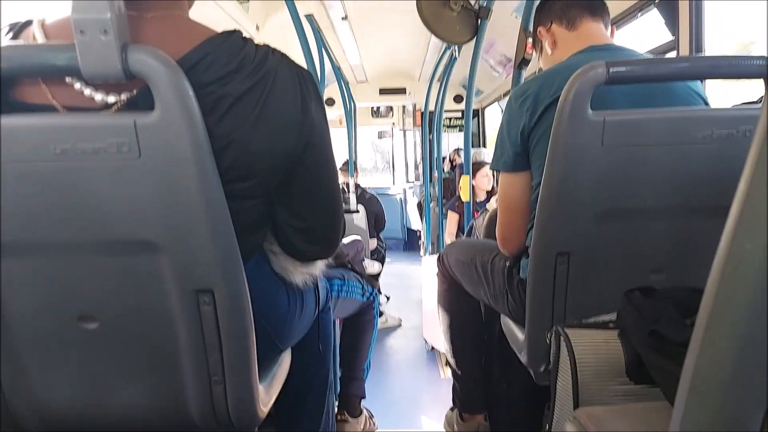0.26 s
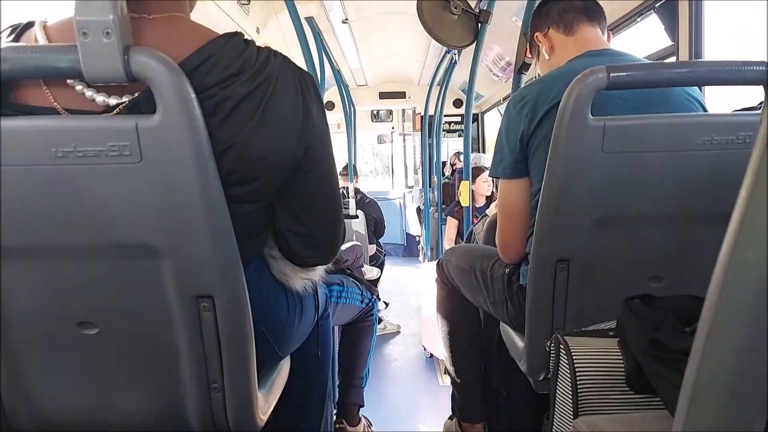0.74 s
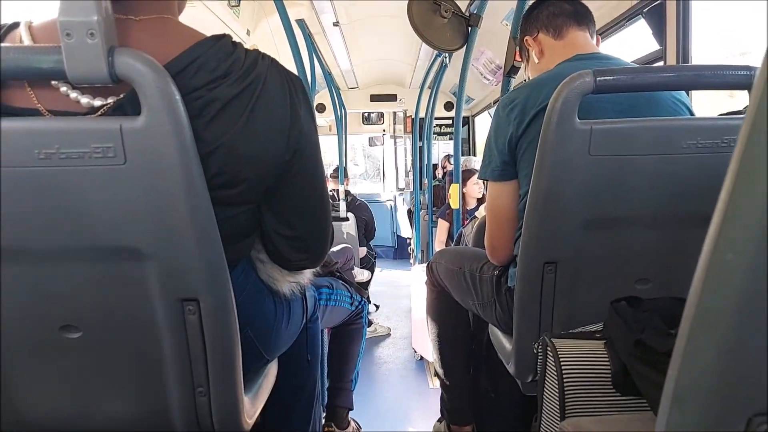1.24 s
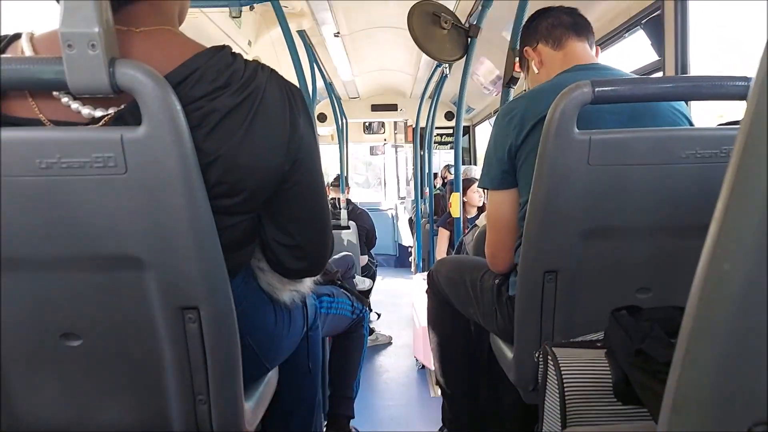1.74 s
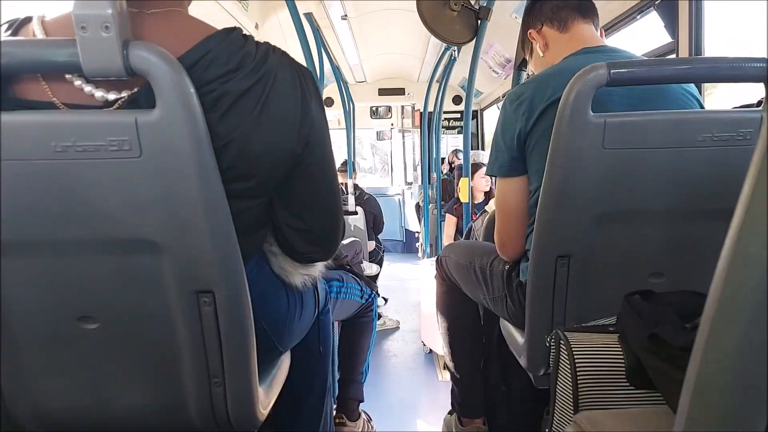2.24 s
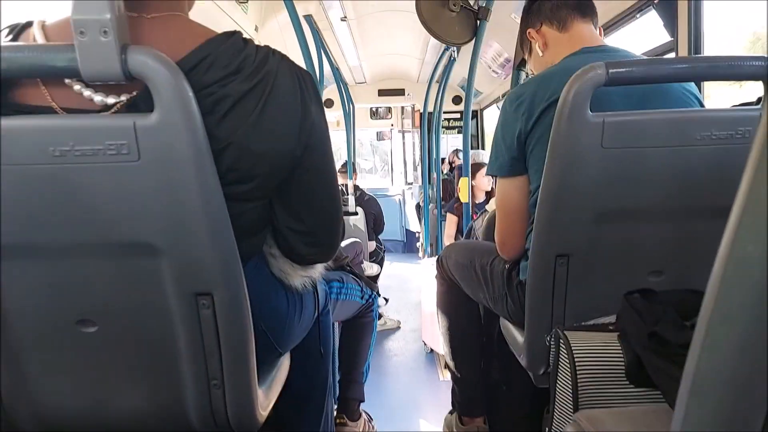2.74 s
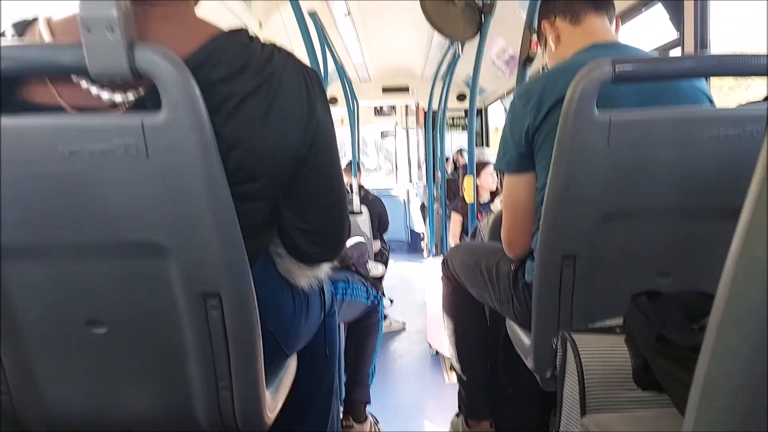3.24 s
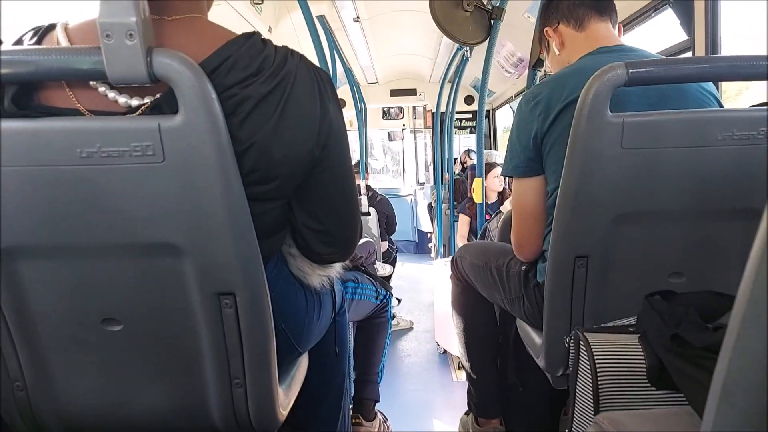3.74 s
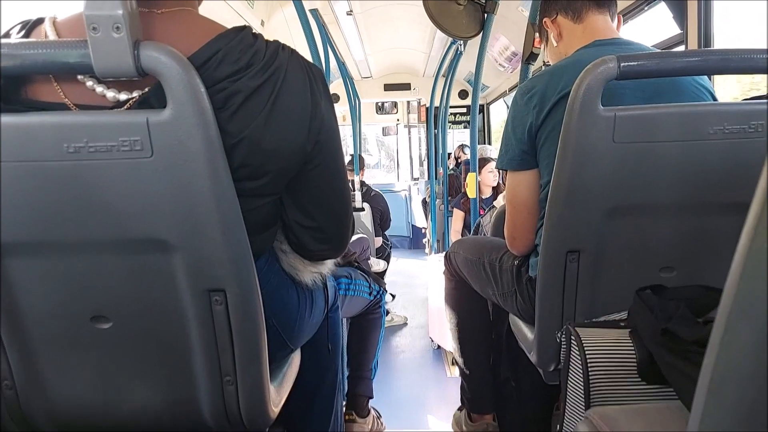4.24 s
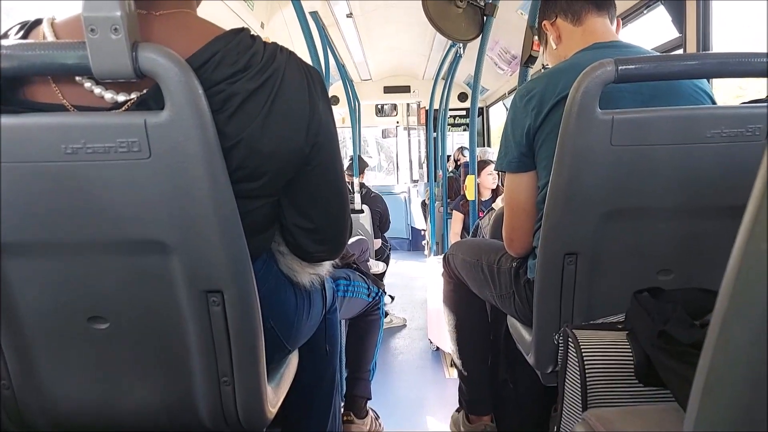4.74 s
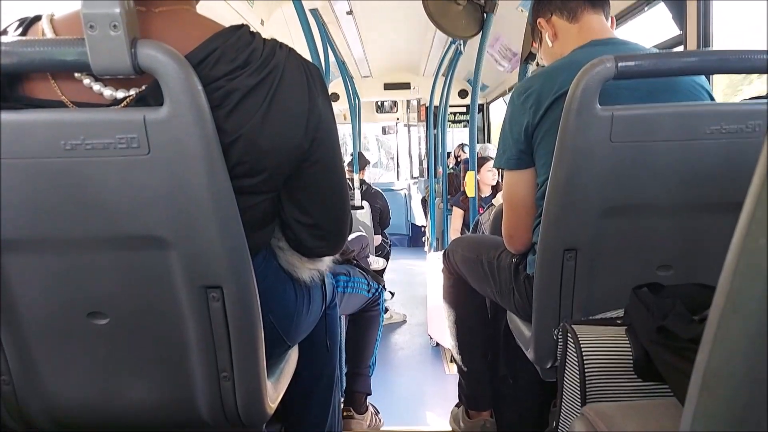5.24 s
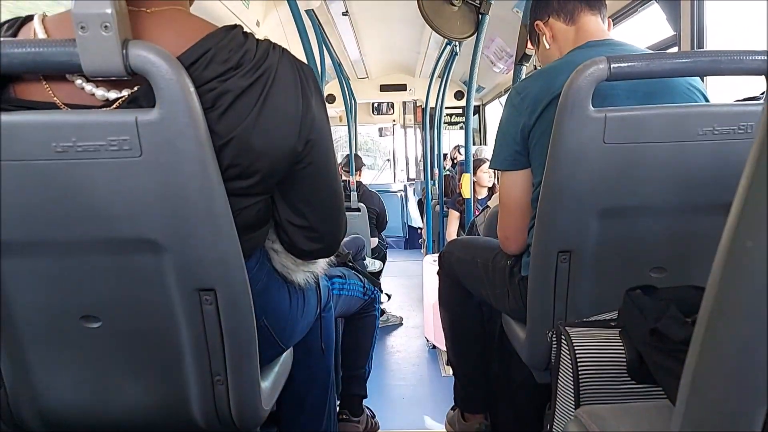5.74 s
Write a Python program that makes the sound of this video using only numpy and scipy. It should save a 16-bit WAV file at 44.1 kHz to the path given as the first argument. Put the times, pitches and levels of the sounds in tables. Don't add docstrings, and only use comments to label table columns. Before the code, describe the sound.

Continuous bus interior: heavy bass drone and floor rumble, muffled window roar, quiet fan and gear hum. Loose fittings click lightly early on, one panel thud stands out before two seconds, and a short burst of escaping air comes with a passing swell of traffic near 2.8. Double knocks and busy rattling follow, then it settles back to steady driving. Handheld stereo phone, bass-heavy, with slightly thin treble.

```python
import sys
import numpy as np
from scipy import signal
from scipy.fft import rfft, irfft, next_fast_len
from scipy.io import wavfile
from scipy.ndimage import uniform_filter1d, map_coordinates

SR = 44100
rng = np.random.default_rng(int(sys.argv[2]) if len(sys.argv) > 2 else 0)


def to_wav(s):
    ch = np.atleast_2d(s).T
    pcm = np.round(np.clip(ch, -1, 1) * 32767)
    wavfile.write(sys.argv[1], SR, pcm.astype(np.int16))


def volts_from_db(level):
    exponent = np.asarray(level, float) / 20
    return 10 ** exponent


N = 264159

# (frequency [Hz], level [dB per Hz])
HISS = [(900, -14), (1700, -6.5), (2500, 2.5), (3300, -5), (4200, -2.5), (5500, -8), (7000, -19.5),
        (10400, -14.5), (13400, -17.5), (15600, -17)]


def unit(x):
    return x / np.sqrt(np.mean(x ** 2) + 1e-20)


def along(points, hz):
    f, v = np.transpose(points)
    return np.interp(np.log(hz + 1), np.log(f + 1), v, left=v[0], right=v[-1])


def curves(rows):
    s, *cols = np.transpose(rows)
    return [np.interp(np.arange(N) / SR, s, c) for c in cols]


def wobble(rate):
    knots = rng.standard_normal(int(N * rate / SR) + 4)
    return map_coordinates(knots, [np.arange(N) * rate / SR])


def humps(times, heights, half_s):
    grid = np.arange(0, N + 128, 128) / SR
    bells = np.exp(-((grid[:, None] - times) / half_s) ** 2)
    return np.interp(np.arange(N) / SR, grid, bells @ heights)


def filtered(x, response):
    m = next_fast_len(N + 8192)
    return irfft(rfft(x, m) * response(np.fft.rfftfreq(m, 1 / SR)), m)[..., :N]


def resonance(f, hz, width):
    return 1 / (1 + ((f - hz) / width * 2) ** 2)


def rush(spectrum, patchy_db):
    # (frequency [Hz], left-right likeness [-1 to 1])
    alike = [(30, .99), (130, .98), (340, .92), (450, .6), (700, .4), (1300, -.1), (3100, 0), (4500, -.08),
             (8000, .08), (15000, -.05)]
    # (frequency [Hz], left-right [dB])
    port_lean = [(60, 1), (110, 0.5), (200, 2.5), (380, 1.5), (700, 1.5), (1290, 1), (2380, 4.5),
                 (4400, -3), (8120, 7.5), (15000, -5.5)]
    z = signal.stft(rng.standard_normal((2, N)), nperseg=512)[2]
    patches = uniform_filter1d(rng.standard_normal(z.shape[1:]), size=6, axis=0)
    patches = uniform_filter1d(patches, size=10, axis=1)
    pair = signal.istft(z * volts_from_db(patchy_db * unit(patches)), nperseg=512)[1][:, :N]

    def mid_side(hz):
        angle = np.arccos(np.clip(along(alike, hz), -1, 1)) / 2
        return volts_from_db(along(spectrum, hz)) * np.array([np.cos(angle), np.sin(angle)])

    mid, side = filtered(pair, mid_side)
    ports = np.array([mid + side, mid - side])
    return unit(filtered(ports, lambda hz: volts_from_db(np.outer([.5, -.5], along(port_lean, hz)))))


def tone(cycles, db, pan_db, lead):
    side = np.array([[.5], [-.5]])
    phase = 2 * np.pi * (cycles + rng.random()) + side * lead
    return np.sqrt(2) * volts_from_db(db + side * pan_db) * np.sin(phase)


def ringing(x):
    # (frequency [Hz], width [Hz], level over the noise [dB])
    metal = [(3525, 30, 5), (3947, 25, 5), (4260, 40, 4), (5976, 25, 6), (6641, 25, 5), (7332, 20, 10),
             (8027, 40, 5), (8771, 35, 6), (9581, 25, 9), (10390, 25, 8), (11195, 35, 5), (12060, 60, 5)]

    def response(f):
        return np.sqrt(1 + sum(volts_from_db(2 * db) * resonance(f, hz, width) for hz, width, db in metal))

    return filtered(x, response)


def fans():
    # (frequency [Hz], level [dB], left-right [dB], left lead [rad])
    hums = [(268.6, -37, 0, -0.2), (360.4, -42, 0, -0.1), (537.2, -48, -2, 1.4), (657.9, -47, 6, -0.1),
            (799.2, -45, -1, -0.7), (987.5, -43.5, 3, -2.1), (1074.2, -50, 0, -0.3), (1598.9, -54, 0, 0.8)]
    t = np.arange(N) / SR
    out = 0
    for hz, db, pan_db, lead in hums:
        turns = hz * t + 1e-4 * hz * wobble(3.956)
        out = out + tone(turns, db + 2.0 * wobble(9), pan_db, lead)
    return out


def knocks():
    # (time [s], peak [dB], frequency [Hz])
    thuds = [
        (0.601, -37, 820),
        (1.828, -22, 680),
        (3.146, -26, 1020),
        (3.233, -23, 1020),
        (3.784, -25, 806),
    ]
    out, t = np.zeros(N + SR), np.arange(SR // 20) / SR
    for s, db, hz in thuds:
        decay = volts_from_db(db - 60 * t / 0.033)
        out[round(s * SR):][:len(t)] += decay * np.sin(2 * np.pi * hz * t) * (1 - np.exp(-t / 0.002))
    return volts_from_db(6.5) * out[:N]


def rattles():
    # (time [s], peak [dB], decay by 60 dB [s])
    hits = [(0.0932, -40.5, 0.2), (0.3651, -42, 0.15), (0.4609, -47, 0.2), (1.0181, -38, 0.16),
            (1.064, -41, 0.22), (1.1797, -36, 0.2), (2.7516, -45, 0.22), (3.1847, -40, 0.2),
            (3.3518, -33, 0.2), (3.4456, -30.5, 0.16), (3.5064, -30, 0.12), (3.5758, -37, 0.2),
            (3.6092, -41, 0.23), (3.6835, -35.5, 0.18), (3.7783, -33.5, 0.15), (3.8177, -46, 0.2),
            (3.933, -51, 0.18), (4.1854, -39, 0.23), (4.5506, -41, 0.18), (4.8, -42, 0.2),
            (5.0614, -41, 0.2), (5.3981, -41, 0.2), (5.8601, -33, 0.18), (5.9439, -45, 0.2)]
    shape, t = np.zeros(N + SR), np.arange(SR // 4) / SR
    for s, db, t60 in hits:
        shape[round(s * SR):][:len(t)] += volts_from_db(db - 60 * t / t60) * (1 - np.exp(-t / 0.0015))
    return shape[:N] * rush(HISS, patchy_db=3.3)


def air():
    # (time [s], hold [s], level [dB], extra body [dB])
    puffs = [(0, 0.0045, -48.5, -3), (0.364, 0.079, -51, -1.5), (0.655, 0.049, -51.5, -3),
             (.76, 0.033, -45.5, -1), (1.063, .01, -50, 0), (1.18, .03, -60, 8), (2.2, .03, -61, 3),
             (2.744, 0.022, -40, -7), (2.774, 0.021, -44.5, 5), (2.822, .07, -45, -4),
             (2.9, 0.083, -44.5, -2.5), (3.018, 0.073, -50, -15), (3.343, .03, -58, 0),
             (3.443, .05, -47.5, -1), (4.36, .02, -58, -3), (4.526, .03, -53, 0), (4.98, 0.11, -57, 4),
             (5.064, 0.14, -56.5, 2), (5.36, .08, -55.5, 3.5), (5.868, .04, -57.5, 4)]
    # (frequency [Hz], width [Hz], level over the hiss [dB])
    pipe = [
        (2430, 320, 5.5),
        (4050, 540, 5.5),
    ]
    open_s, fade_db_per_s = 0.0042, 220
    top, low, t = np.zeros(N + SR), np.zeros(N + SR), np.arange(SR // 2) / SR
    for s, hold_s, db, body_db in puffs:
        fading_db = db - fade_db_per_s * np.clip(t - hold_s, 0, None)
        puff = np.minimum(t / open_s, 1) * volts_from_db(fading_db)
        top[round(s * SR):][:len(t)] += puff ** 2
        low[round(s * SR):][:len(t)] += (puff * volts_from_db(body_db)) ** 2

    def pipe_response(f):
        return volts_from_db(-3 + sum(db * resonance(f, hz, width) for hz, width, db in pipe))

    hiss = rush(HISS, patchy_db=2.0)
    body = filtered(hiss, lambda hz: 1 / (1 + (hz / 5500) ** 6))
    piped = filtered(body, pipe_response)
    flutter = unit(volts_from_db(1.5 * wobble(150)))
    return volts_from_db(9.5) * flutter * (np.sqrt(top[:N]) * (hiss - body) + np.sqrt(low[:N]) * piped)


def road(cycles):
    # (frequency [Hz], level [dB per Hz])
    floor_spectrum = [(15, -10), (34, -12), (41, -2), (58, 3.5), (68, -2), (77, 2.5), (87, -3.5), (100, 5),
                      (120, -12.5), (200, -60)]
    body_spectrum = [(80, -31), (105, -7), (122, -1.5), (136, -8), (150, -7), (165, -6.5), (190, -5),
                     (212, -12.5), (400, -67)]
    cabin_spectrum = [(130, -40), (200, -1), (290, 0.5), (350, 0.5), (390, -5), (520, -8.5), (760, -5),
                      (900, -10.5), (1400, -18.5), (3000, -46.5)]
    roar_spectrum = [(500, -10), (900, 3), (1400, -0.5), (2600, -1), (3200, -11), (4500, -10.5),
                     (6400, -19), (7400, -29), (12500, -25.5), (14300, -23), (15000, -33), (15700, -28)]
    # (time [s], floor jolt [dB], body jolt [dB], panel throb [dB])
    bumps = [(.07, -35, -30, -20), (.29, -23, -29, -15), (.5, -28, -24, -16.5), (.735, -28, -39, -19),
             (.94, -24, -32, -18), (1.22, -29, -31, -21.5), (1.38, -35, -50, -45), (1.62, -31, -30, -26),
             (1.82, -32, -26, -21), (2.05, -25, -29, -24), (2.2, -32, -32, -30), (2.58, -24, -30, -24),
             (2.9, -29, -29.5, -27), (3.17, -34, -28, -30), (3.32, -32, -28, -24), (3.55, -30, -31, -33),
             (3.79, -23, -25.5, -29), (3.99, -24, -25, -17), (4.229, -21, -22.5, -21),
             (4.35, -26, -43, -34), (4.47, -30, -25, -20.5), (4.65, -30, -33, -22), (4.84, -23, -32, -29),
             (5.11, -38, -30, -27), (5.55, -28, -28, -34), (5.72, -34, -38, -22), (5.97, -21.5, -39, -38)]
    smooth_db = [
        -24,
        -27,
        -32,
    ]
    # (time [s], roar [dB])
    traffic = [
        (0, -39.5),
        (1.75, -39.5),
        (2.1, -38.5),
        (2.72, -37.5),
        (2.85, -34),
        (3.2, -36.5),
        (3.8, -37.5),
        (4.5, -39),
        (5.99, -39.5),
    ]
    s, *jolts_db = np.transpose(bumps)
    half_widths_s = [0.063, 0.063, 0.033]
    rumble, boom, throb = [volts_from_db(calm_db) + humps(s, volts_from_db(db), half_s)
                           for calm_db, db, half_s in zip(smooth_db, jolts_db, half_widths_s)]
    low = volts_from_db(-3.0) * rumble * rush(floor_spectrum, patchy_db=0.2)
    low += volts_from_db(-3.0) * boom * rush(body_spectrum, patchy_db=2.0)
    panel = 135.6 * np.arange(N) / SR
    low += throb * tone(panel + 0.17 * wobble(9), -3.1, 1.9, 0.23)
    roar_db, = curves(traffic)
    cabin = volts_from_db(-28.5 + 0.36 * (roar_db + 36.5)) * rush(cabin_spectrum, patchy_db=0.6)
    clatter = volts_from_db(0.32 * np.cos(2 * np.pi * 4 * cycles))
    roar = volts_from_db(roar_db + 4.5) * clatter * ringing(rush(roar_spectrum, patchy_db=0.85))
    return low + cabin + roar


def turbo(cycles):
    # (time [s], frequency [Hz])
    spool = [
        (0, 13805),
        (.65, 13785),
        (1.3, 13755),
        (2.05, 13715),
        (2.8, 13760),
        (3.3, 13735),
        (3.8, 13700),
        (4.5, 13690),
        (5.3, 13670),
        (6, 13650),
    ]
    # (time [s], level over idle [dB])
    surges = [(.43, 1), (.63, 6), (.85, 0), (1.19, 7), (1.85, 5), (2.29, 2), (2.78, 10), (2.95, 6),
              (3.15, 3), (3.54, 7), (3.69, 4), (3.78, 6), (4.12, 3), (4.8, 2), (5.15, 3), (5.42, 7),
              (5.99, 7)]
    db = -60.5 + humps(*np.transpose(surges), half_s=0.038)
    drift = wobble(18)
    firing = 2 * np.pi * 4 * cycles
    nudge = volts_from_db(-23 + 2.5 * wobble(4)) * np.sin(firing)
    turns = np.cumsum(curves(spool)[0] + 5 * drift) / SR + nudge
    flutter = volts_from_db(3.5 * np.array([wobble(70), wobble(70)]) + .7 * np.cos(firing))
    whistle = unit(flutter) * tone(turns, db + 4.0, -6.5, 1.7 + 0.55 * wobble(6))
    blades = filtered(rng.standard_normal((2, N)), lambda f: resonance(f, 13730, 440))
    return whistle + volts_from_db(db + 3) * unit(blades)


def engine():
    # (time [s], engine cycles [per s])
    speed = [
        (0, 21.75),
        (3.5, 21.755),
        (3.8, 21.8),
        (6, 21.8),
    ]
    # (time [s], drone level [dB])
    load = [(0, -14.5), (.5, -15), (.75, -15.5), (1.1, -16.5), (1.5, -15.5), (2.2, -16), (2.65, -16),
            (2.9, -19), (3.3, -18.5), (3.8, -17.5), (4.3, -15.5), (4.7, -17.5), (4.9, -13.5), (5.2, -18),
            (5.5, -15), (5.75, -15.5), (5.99, -13)]
    # (time [s], depth [dB])
    sags = [(.19, 10.5), (.4, 7), (.63, 6), (.85, 7.5), (1.22, 6), (1.83, 3.5), (2.12, 4.5), (2.55, 4),
            (2.77, 6), (2.99, 0.5), (3.47, 3), (3.6, 3), (3.95, 1), (4.14, 6), (4.45, 1), (4.94, 5),
            (5.3, 2), (5.67, 3), (5.89, 10)]
    # (multiple of the engine cycle, level [dB], left-right [dB], left lead [rad])
    harmonics = [(2, -33, 1, 0.1), (6, -41, 2, 0.2), (7, -38, 2, 0.4), (8, -33, 3, 0.1), (10, -40, 4, 0.1),
                 (11, -42, 4, 0.3), (13, -39, 0, 0.5), (15, -45, 3, -0.1), (16, -41, 1, -0.1),
                 (18, -42, 4, -2.9), (19, -49, -6, -0.8), (20, -52, 6, 0.2), (21, -49, 10, 1.0),
                 (22, -42, 4, -0.1), (24, -50, -4, 1.4), (26, -51, -3, -0.0), (28, -50, 0, 1.9),
                 (31, -51, 5, 0.2), (34, -47, -7, 1.7), (36, -38, 1, 1.0), (38, -51, -1, 1.8),
                 (60, -55, 4, 1.1)]
    drone_db = curves(load)[0] - humps(*np.transpose(sags), half_s=0.037)
    cycles = np.cumsum(curves(speed)[0]) / SR + 0.0038 * wobble(5)
    out = tone(4 * cycles, drone_db - .8, .3, .3)
    for k, db, pan_db, lead in harmonics:
        out += tone(round(k) * cycles, db + 1.6 * wobble(9), pan_db, lead)
    return out, cycles


def scene():
    drone, cycles = engine()
    return drone + fans() + turbo(cycles) + road(cycles) + ringing(air() + rattles()) + knocks()


def sparing(x, low_hz, high_hz, floor_db):
    band = filtered(x, lambda hz: (hz > low_hz) & (hz <= high_hz))
    power = np.abs(uniform_filter1d((band ** 2).mean(axis=0), size=1024))
    is_open = power * volts_from_db(4.5 * wobble(26)) > volts_from_db(2 * floor_db)
    return x - band * (1 - uniform_filter1d(is_open.astype(float), size=300))


def thinned(x, low_hz, high_hz, share):
    hz, _, z = signal.stft(x, SR, nperseg=2048)
    treble = (hz > low_hz) & (hz < high_hz)
    power = uniform_filter1d(np.abs(z[treble]) ** 2, size=12, axis=0)
    power = power / np.median(power, axis=1, keepdims=True)
    power = power / np.median(power, axis=0) ** .7
    z[treble] *= power > np.quantile(power, share)
    return signal.istft(z, SR, nperseg=2048)[1][:N]


def top_cut(x):
    return signal.sosfilt(signal.butter(12, 15740, fs=SR, output="sos"), x)


def record(dry):
    top_hz = 15800
    x = filtered(dry * np.minimum(np.arange(N) / 60, 1), lambda hz: hz < top_hz)
    for low_hz in range(14300, top_hz, 500):
        x = sparing(x, low_hz, low_hz + 500, floor_db=-63.5)
    mid = thinned((x[0] + x[1]) / 2, 6800, 13300, share=.22)
    side = thinned((x[0] - x[1]) / 2, 6300, 13300, share=.5)
    return top_cut(np.array([mid + side, mid - side]))


dry = scene()
out = record(dry)
to_wav(out)
```